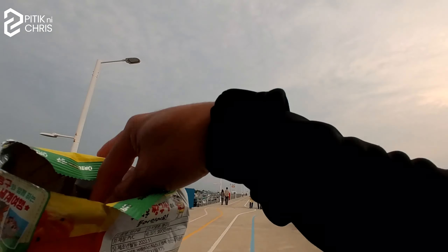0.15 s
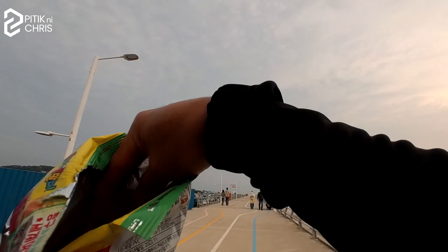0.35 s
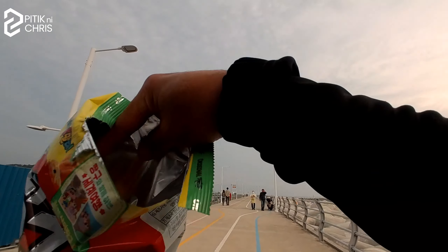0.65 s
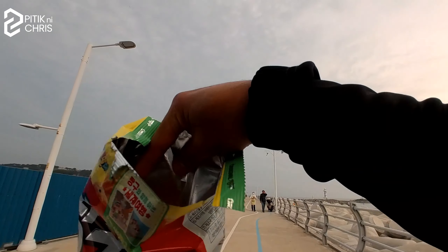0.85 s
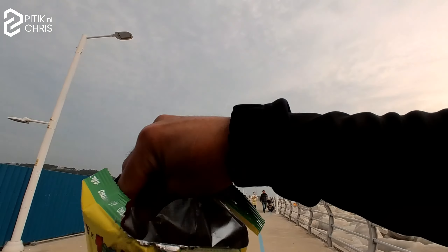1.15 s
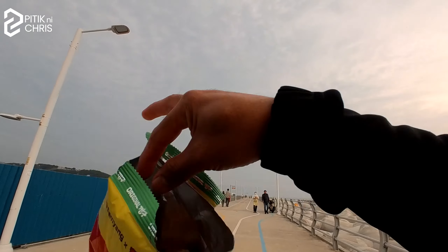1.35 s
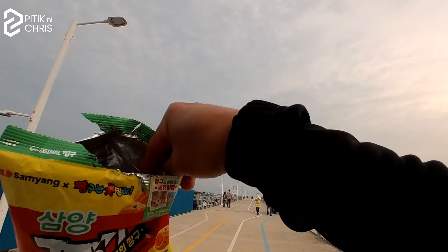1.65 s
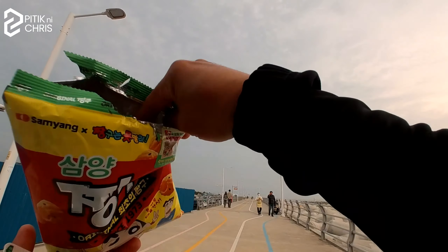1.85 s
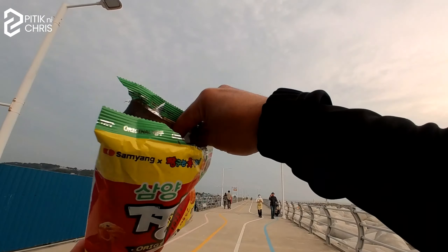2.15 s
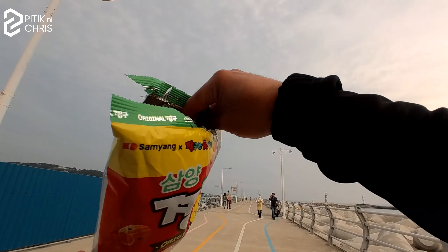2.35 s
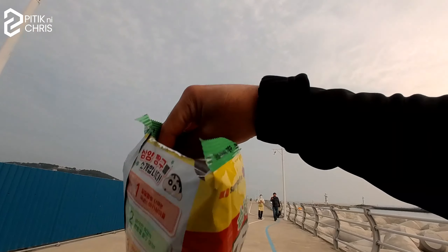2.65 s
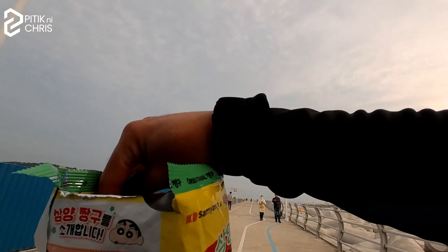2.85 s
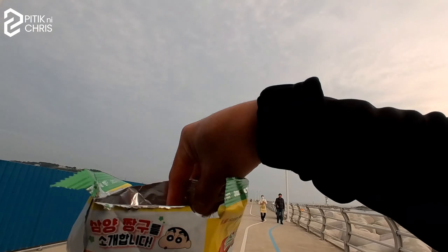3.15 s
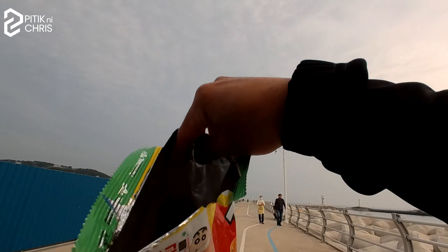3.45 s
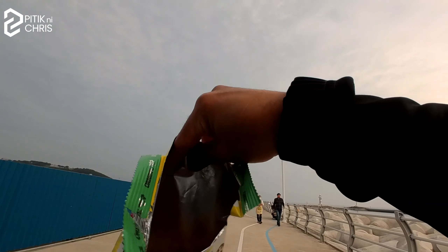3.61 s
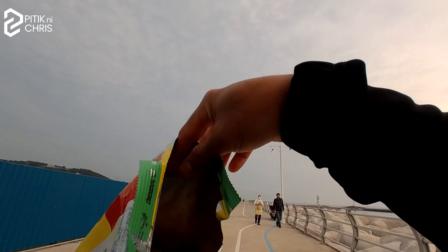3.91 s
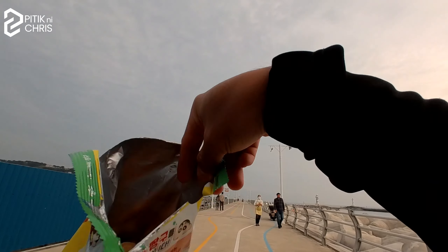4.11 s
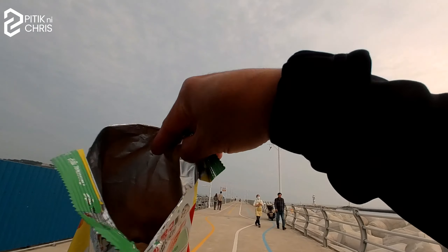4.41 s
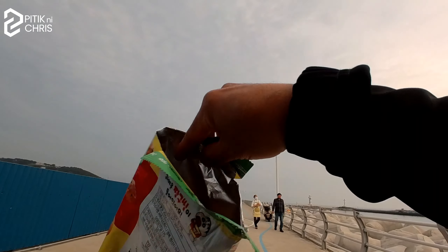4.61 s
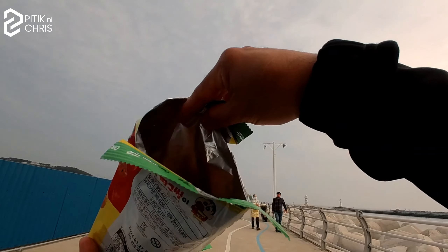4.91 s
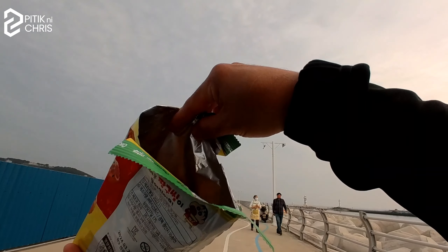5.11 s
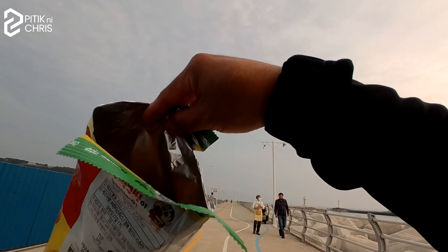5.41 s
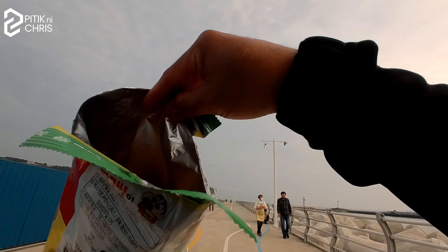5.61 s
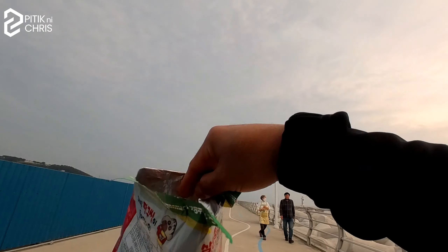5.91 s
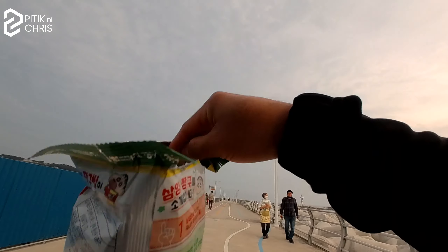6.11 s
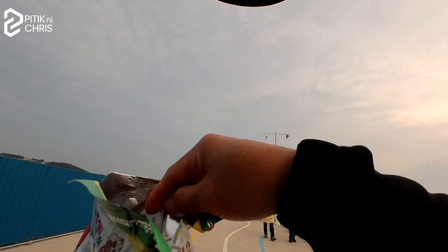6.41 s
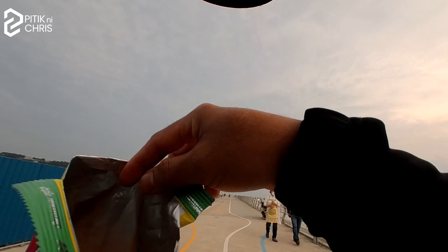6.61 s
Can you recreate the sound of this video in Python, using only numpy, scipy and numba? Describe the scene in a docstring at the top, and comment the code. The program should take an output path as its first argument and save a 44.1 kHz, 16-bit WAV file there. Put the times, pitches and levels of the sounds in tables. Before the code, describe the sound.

A hand rummages in a foil-lined snack bag close to the microphone, crackling and snapping over light wind buffeting and a faint distant rumble.

```python
"""Foil crackles and snaps close by: a hand rummages in a lined snack bag, outdoors on a wide path.
A small camera with two microphone ports sits just behind the bag. Creases in the film let go, each a
brief ring of scattered pitches; fingers hiss along the wall and twice a fingertip drags the film.
Breeze buffets the ports in shaped noise, low bumps ring briefly, and a rumble with a hum lies far off.
The recorder rounds off the loudest peaks and cuts the top."""
import sys
import numpy as np
from scipy import signal
from scipy.fft import rfft, irfft
from scipy.io import wavfile
from scipy.ndimage import uniform_filter1d
from numba import njit

SR = 44100
rng = np.random.default_rng(int(sys.argv[2]) if len(sys.argv) > 2 else 0)


def to_wav(s):
    """Save 16-bit WAV."""
    ch = np.atleast_2d(s).T  # columns
    pcm = np.round(np.clip(ch, -1, 1) * 32767)  # PCM
    wavfile.write(sys.argv[1], SR, pcm.astype(np.int16))


N = 298380  # samples
OPPOSITE = np.array([[1], [-1]])  # signs of the side signal at the left and right port


def undb(db):
    """Amplitude ratio of a level in dB."""
    return 10 ** (np.asarray(db) / 20)


def along(hz, table, axis=1):
    """Read a column of a table on a log-frequency axis."""
    rows = np.array(table, float)
    return np.interp(np.log(np.maximum(hz, 1)), np.log(rows[:, 0]), rows[:, axis])


def curve(table, s):
    """The columns of a time table at the moments s."""
    rows = np.array(table, float)
    return [np.interp(s, rows[:, 0], column) for column in rows[:, 1:].T]


def colour(x, table, axis=1):
    """Causal minimum-phase filter whose gain follows the table, made by folding the cepstrum."""
    gain = undb(along(np.fft.rfftfreq(2048, 1 / SR), table, axis=axis))
    cepstrum = irfft(np.log(gain))
    cepstrum[1:1024] *= 2
    cepstrum[1025:] = 0
    impulse = irfft(np.exp(rfft(cepstrum)))
    return signal.fftconvolve(x, impulse)[:N]


def walk(rate):
    """Random levels held 1 / rate s and slewed twice; spread near 1."""
    hold = int(SR / rate)
    steps = np.repeat(rng.standard_normal(N)[:N // hold + 1], hold)
    return 1.3 * uniform_filter1d(uniform_filter1d(steps, hold), hold)[:N]


def noise_pair(table, alike):
    """Coloured noise of rms 1 at two ports that share part of it."""
    mid, side = (colour(rng.standard_normal(N), table) for _ in range(2))
    alike = np.clip(alike, 0, 1)
    pair = np.sqrt(1 + alike) * mid + np.sqrt(1 - alike) * side * OPPOSITE
    return pair / pair.std()


def swell(s, peak_s, db, rise_s, hold_s, fall_s):
    """Power of a gesture that climbs to its peak, holds and dies away, 20 dB in each given time."""
    before = (peak_s - s) / rise_s
    after = (s - peak_s - hold_s) / fall_s
    return undb(2 * (db - 20 * np.maximum(np.maximum(before, after), 0)))


# The far rumble behind the path. Each row: frequency in Hz, relative density in dB per Hz.
RUMBLE = [(30, 2.5), (75, 4.5), (150, -4), (400, -11), (1200, -21), (2500, -34), (6000, -71), (12000, -85)]
RUMBLE_DB, RUMBLE_ALIKE = -35.5, .88  # mean level in dB; how alike the two ports are, 0 to 1
HUM_HZ, HUM_WIDTH_HZ, HUM_DB = 76, 9.2, -38.5


def distance():
    """Far rumble as slowly drifting noise, with one low hum: a narrow band of noise, so it wavers."""
    b, a = signal.iirpeak(HUM_HZ, HUM_HZ / HUM_WIDTH_HZ, SR)
    hum = signal.lfilter(b, a, rng.standard_normal(N))
    rumble = undb(RUMBLE_DB + walk(1.42)) * noise_pair(RUMBLE, RUMBLE_ALIKE)
    return rumble + undb(HUM_DB) * hum / hum.std()


# Breeze at the microphone ports. Each row: time in seconds, relative level in dB.
BREEZE = [(0, -33), (.6, -26), (1.3, -29), (2.1, -29), (2.6, -38), (3.3, -35), (4.2, -32), (4.6, -45),
          (5.4, -35), (6, -33), (6.3, -33), (6.77, -32)]
# Puffs standing out of it. Each row: peak in seconds, relative level in dB,
# time in seconds to rise and again to fall by 20 dB.
PUFFS = [(.002, -10, .025), (.165, -23, .12), (.34, -21, .05), (.55, -22, .15), (1.0, -23, .08),
         (1.37, -23, .1), (1.49, -23, .15), (1.785, -20, .06), (2.13, -20.5, .07), (2.22, -26, .08),
         (3.0, -26, .06), (3.09, -25, .05), (3.37, -22, .12), (3.88, -31, .3), (4.47, -28, .06),
         (4.78, -30, .08), (4.96, -25, .05), (5.14, -27, .08), (6.07, -27, .1), (6.22, -27, .07),
         (6.44, -23, .12), (6.56, -25, .07)]
# Spectrum of the buffeting. Each row: frequency in Hz, relative density in dB per Hz.
GUST = [(20, -5.5), (45, -1.5), (75, 3), (120, 2), (200, -10), (350, -17.5), (700, -59)]
# The part of it not common to both ports. Each row: frequency in Hz, share in dB.
APART = [(30, -2.5), (170, -3), (260, -13), (1000, -13)]


def breeze():
    """Buffeting is low noise that differs in part between the ports; strong gusts reach higher."""
    s = np.arange(N) / SR
    steady = undb(2 * curve(BREEZE, s)[0])
    puffs = sum(swell(s, peak_s, db, span_s, 0., span_s) for peak_s, db, span_s in PUFFS)
    db = 10 * np.log10(steady + puffs) + 2.5 * walk(27)
    mid, side = (colour(rng.standard_normal(N), GUST) for _ in range(2))
    buffet = (mid + colour(side, APART) * OPPOSITE) / mid.std()
    # the higher flapping grows faster than the gust, up to a limit
    flap = noise_pair([(90, -30), (160, -3), (240, 0), (400, -20), (800, -45)], .85)
    flap_db = np.minimum(db + 0.32 * (db + 11.5) - 11.5, -22)
    return undb(db - 1.5) * buffet + undb(flap_db) * flap


@njit
def ring(start, pole, rise, left, right, life, n):
    """Sum of dying sines that build up over a cycle, each with its own size and phase at either port."""
    out = np.zeros((2, n))
    for k in range(len(start)):
        z, lack = 1 + 0j, 1.
        for i in range(start[k], min(start[k] + life[k], n)):
            out[0, i] += (1 - lack) * (z * left[k]).imag
            out[1, i] += (1 - lack) * (z * right[k]).imag
            z *= pole[k]
            lack *= rise[k]
    return out


# How the two microphone ports disagree in phase.
# Each row: frequency in Hz, mean lag of the left port in radians, scatter of that lag in radians.
LAG = [(200, 0, .15), (800, .2, .22), (1500, .3, .5), (2000, .7, .6), (2600, 2.6, .8), (3500, 2.2, 1.3),
       (8000, 2.3, 1.5), (14000, 3, 1.7)]


def film(s, hz, size, t60):
    """Dying rings, falling 60 dB in t60 s; in the treble the paths to the ports fall out of step."""
    s, hz, size, t60 = (v.ravel() for v in np.broadcast_arrays(s, hz, size, t60))
    lag = along(hz, LAG) + along(hz, LAG, axis=2) * rng.standard_normal(len(s))
    pole = np.exp(2j * np.pi * hz / SR - np.log(1000) / (t60 * SR))
    rise = np.exp(-2.5 * hz / SR)
    start = np.clip(s * SR, 0, N - 1).astype(np.int64)
    life = (t60 * SR).astype(np.int64)
    left, right = size * np.exp(-.5j * lag), size * np.exp(.5j * lag)
    return ring(start, pole, rise, left, right, life, N)


# Low bumps, likely the camera being jogged. Each row: start in seconds, pitch in Hz, relative level in dB.
BUMPS = [(.0105, 210, 2), (.141, 110, 0), (.1655, 140, -3), (.188, 95, -4), (3.087, 170, -4),
         (3.362, 60, -1.5)]
BUMP_CYCLES = 5  # cycles to fall by 60 dB


def bumps():
    """Each bump is a low ring that dies in a few cycles."""
    s, hz, db = np.transpose(BUMPS)
    return film(s, hz, undb(db), BUMP_CYCLES / hz)


# Pushes of the hand in the bag, just in front of the microphones. Each row: peak in seconds,
# relative crackle level in dB, seconds to rise 20 dB, seconds held, seconds to fall 20 dB,
# brightness in dB at the peak, sheen of the top octave in dB at the peak.
PUSHES = [(.03, -40, .2, .18, .2, -5, 2), (.3, -28, .1, .04, .1, 4, 6), (.38, -22, .1, .03, .15, -3, 3),
          (.5, -16.5, .35, 0, .3, -2, 3), (.65, -15, .15, 0, .04, -2, -1),
          (.75, -27.5, .25, .18, .08, -2, -10), (.99, -27, .12, 0, .12, -3, -18),
          (1.24, -21.5, .2, 0, .25, -4, -7), (1.29, -24.5, .1, .09, .09, 5, -9),
          (1.45, -30, .15, 0, .06, 3, -4), (1.55, -29, .05, .04, .1, -5, -16),
          (1.63, -28, .15, .01, .05, -1, -3), (1.74, -20, .09, 0, .1, 2, 2),
          (1.77, -14, .08, 0, .045, 0, -2), (1.82, -33, .05, .05, .1, -5, -8),
          (1.91, -26.5, .08, .04, .15, 0, -3), (2.06, -21.5, .05, 0, .08, -2, -2),
          (2.12, -19, .17, .01, .15, 0, 1), (2.21, -27, .2, .03, .1, -2, 0),
          (2.28, -25.5, .08, 0, .3, 1, -3), (2.52, -32, .25, .09, .1, 0, 2),
          (2.78, -40, .04, .06, .1, 10, -7), (2.88, -25, .06, 0, .4, 1, 0), (2.96, -25, .1, 0, .15, -3, 0),
          (3.05, -27, .15, .04, .05, -1, 2), (3.18, -31, .05, .05, .05, 3, 1),
          (3.28, -21, .08, .13, .04, 1, 0), (3.49, -27, .15, .03, .09, 1, -7),
          (3.69, -17.5, .1, .03, .07, 5, -9), (3.91, -25, .15, .02, .3, 1, -9),
          (4.17, -23.5, .1, .06, .4, 1, -3), (4.44, -23, .08, 0, .1, 2, 2),
          (4.48, -15.5, .1, 0, .055, -2, -1), (4.54, -34, .05, .03, .2, 1, -4),
          (4.76, -23.5, .16, 0, .22, 0, -1), (4.9, -20, .12, .02, .2, 3, 1), (5.05, -37, .1, .03, .1, 6, 2),
          (5.19, -26, .025, 0, .02, -6, 0), (5.24, -36, .07, 0, .35, -2, -7),
          (5.37, -25, .025, .165, .08, 3, -2), (5.6, -36, .1, .05, .1, 0, -3),
          (5.78, -30, .05, 0, .1, 2, 0), (6.01, -19, .22, .01, .17, 3, -1),
          (6.24, -25.5, .2, 0, .12, -1, -2), (6.36, -19, .25, .02, .16, 1, 1),
          (6.55, -41, .1, .02, .1, -2, -3), (6.7, -41, .05, .1, .1, -1, -8)]
REST_DB, REST_BRIGHT_DB, REST_SHEEN_DB = -50, -3, -6  # between pushes
DULL_PER_DB, MATT_PER_DB = .3, .3  # dB of brightness and of sheen lost per dB below the peak of a push


def hand(s):
    """Crackle level, brightness, sheen: pushes add up, the loudest sets the colour, flanks are duller."""
    grid = np.arange(0, N / SR + .01, .002)
    rows = np.array(PUSHES)
    rest = undb(2 * REST_DB) + 0 * grid
    power = np.array([swell(grid, *row[:5]) for row in rows] + [rest])
    total = power.sum(axis=0)
    db = 10 * np.log10(total)
    # averages weighted by the power of each push
    traits = np.vstack([rows[:, [1, 5, 6]], [REST_DB, REST_BRIGHT_DB, REST_SHEEN_DB]])
    peak_db, bright_db, sheen_db = traits.T @ power / total
    bright_db = bright_db + DULL_PER_DB * (db - peak_db)
    sheen_db = sheen_db + MATT_PER_DB * (db - peak_db)
    return [np.interp(s, grid, v) for v in (db, bright_db, sheen_db)]


def sheen(s):
    """Top octave against the rest of the treble, as the bag turns."""
    return hand(s)[2]


def scuff():
    """Fingers and crumbs sliding on the wall: a fluttering hiss that thins out when the hand rests."""
    db, bright_db, sheen_db = hand(np.arange(N) / SR)
    dull = noise_pair([(150, 0), (2200, 0), (3600, -30)], .94)
    keen = noise_pair([(1800, -40), (2800, 0), (7000, 0), (9000, -30)], 0)
    fine = noise_pair([(6000, -40), (8000, 0), (16000, 0)], 0)
    busy_db = 0.1 * (db + 11)
    flutter = undb(3.2 * walk(90) + 2.56 * walk(300))
    treble = flutter * undb(bright_db) * (undb(-4) * keen + undb(sheen_db + 2.5) * fine)
    return undb(db + busy_db + 2.57 * walk(60)) * (undb(-2) * dull + treble)


# A fingertip dragged over taut film inside the bag: one long stroke, then one quick slip.
# Each row of a stroke: time in seconds, whistle in Hz, relative level in dB.
LONG_STROKE, QUICK_SLIP = [
    [(2.765, 2960, -55), (2.79, 2930, -29), (2.82, 2960, -30), (2.85, 2930, -34), (2.92, 2600, -28),
     (2.95, 2450, -60)],
    [(3.179, 3280, -13), (3.1845, 2390, -11), (3.192, 1500, -17)],
]


def drag(stroke, ring_s):
    """Stick and slip: quick irregular tugs ring the stretched film and the slack wall beside it."""
    s = np.arange(stroke[0][0], stroke[0][0] + .2, .0005)
    s = s + .0005 * rng.random(len(s))
    hz, db = curve(stroke, s)
    size = undb(db) * (s < stroke[-1][0])
    wobble = 1 + .035 * rng.standard_normal((2, len(s)))
    taut = film(s, hz * wobble[0], size, ring_s)
    slack = film(s, 0.357 * hz * wobble[1], undb(-16) * size, 0.028)
    return taut + slack


def crease(s, body_db, treble_db, sheen_db, t60, ragged_s, scatter_db, count):
    """A crease lets go with one inward jerk; small facets follow raggedly, ring high and die soon."""
    place, when, strength = rng.random((len(s), count, 3)).transpose(2, 0, 1)
    # one pitch in each of count equal log-frequency bands
    hz = 170 * (16000 / 170) ** ((np.arange(count) + place) / count)
    treble, top = 1 / (1 + (2600 / hz) ** 6), 1 / (1 + (7700 / hz) ** 6)
    db = (1 - treble) * body_db[:, None] + treble * treble_db[:, None] + top * sheen_db[:, None]
    db = db + scatter_db * np.log(strength + 0.0085)
    # sizes rise with pitch so that the sum is flat per Hz
    size = -undb(db) * (hz / 1400) ** 0.93
    late_s = ragged_s * when ** 2 * (.3 + 0.58 * treble)
    return film(s[:, None] + late_s, hz, size, t60 * (hz / 1400) ** -.4)


def crackle(count=4000):
    """Many small creases, bunched; the harder the hand works the more of them go."""
    slot, keep, luck, tint = rng.random((count, 4)).T
    s = (np.arange(count) + slot) / count * N / SR
    db, bright_db, _ = hand(s)
    share = np.clip(undb(.6 * (db + 20)), .05, 1)
    bunch_db = 3.5 * walk(35)[(s * SR).astype(int)]
    luck_db = -2.9 * np.log(luck + 0.013)
    # the fewer that go, the larger each is
    size_db = db - 9 + bunch_db + luck_db - 10 * np.log10(share)
    size_db += np.where(keep < share, 0, -120)  # silence the rest
    treble_db = size_db + bright_db + 4.2 * (tint - .5)
    return crease(s, size_db, treble_db, sheen(s), 0.013, ragged_s=.0015, scatter_db=2, count=12)


# Big creases that snap out of the crackle, close to the microphones.
# Each row: start in seconds, relative ring level in dB, main ring in Hz, relative treble level in dB.
SNAPS = [(.0131, -20, 816, -33), (.1038, -26, 1220, -42), (.1228, -24, 1900, -50), (.1716, -23, 1070, -37),
         (.2341, -22.5, 1270, -36), (.3105, -16, 800, -20), (.3355, -17, 1080, -22), (.3525, -30, 980, -23),
         (.3815, -29, 1360, -15), (.3934, -25, 1610, -14), (.4044, -28, 1500, -19), (.4322, -11, 920, -20),
         (.442, -11, 1310, -11), (.458, -10, 1450, -18), (.472, -9, 1020, -18), (.494, -1.5, 1630, -14),
         (.4997, -8, 1210, -15), (.519, -11, 2040, -23), (.5264, -9, 1390, -15), (.5377, -4.5, 1670, -18),
         (.5519, -8, 1480, -17), (.5954, -9, 1360, -12), (.6374, -16, 1160, -12), (.6431, -1.5, 1870, -19),
         (.6506, -10, 1450, -12), (.6681, -15, 1400, -15), (.7434, -19, 1410, -17), (.7553, -11, 1540, -28),
         (.7604, -13, 1290, -15.5), (.7665, -12, 1340, -25), (.8202, -3, 1160, -17),
         (.8608, -12, 1060, -22), (.878, -15, 1050, -41), (.8941, -29, 990, -17), (.92, -3, 1980, -17.5),
         (.9757, -15, 1040, -43), (1.0178, -21, 1120, -42), (1.1068, -24, 1150, -40),
         (1.114, -28, 1260, -39), (1.1468, -14, 2020, -20), (1.191, -7, 1480, -21),
         (1.2037, -11, 1530, -30), (1.2243, -6.5, 1290, -19), (1.2345, -9, 1790, -28),
         (1.2456, -7, 1120, -28), (1.2515, -9, 1820, -19), (1.2678, -11, 1620, -18),
         (1.2999, -10, 1070, -31), (1.3064, -17, 1700, -13.5), (1.375, -7, 1230, -25),
         (1.3839, -16, 1070, -19), (1.4576, -20, 1510, -17.5), (1.5475, -16, 1130, -24),
         (1.59, -27, 1060, -23), (1.6417, -17, 804, -26), (1.6854, -27, 1000, -16.5),
         (1.7112, -13, 1160, -26), (1.7206, -18, 1140, -14), (1.7377, -10, 1110, -22),
         (1.7641, -5.5, 1370, -19), (1.7705, -10, 1490, -17), (1.81, -14.5, 1580, -28),
         (1.8321, -24, 1090, -17), (1.8657, -15, 980, -24), (1.8985, -10, 1220, -17.5),
         (1.9224, -19, 1500, -15), (2.002, -18, 1210, -42), (2.0406, -9, 1460, -17.5),
         (2.0492, -10.5, 1460, -31), (2.073, -23, 1210, -26), (2.2903, -10, 960, -24),
         (2.3511, -13, 1130, -24), (2.4196, -18, 1760, -26), (2.4486, -19, 1870, -21),
         (2.463, -14, 1520, -27), (2.477, -23, 1610, -20.5), (2.4919, -14.5, 1940, -31),
         (2.5115, -25, 1160, -18), (2.517, -17, 1430, -28), (2.5473, -17, 1420, -21),
         (2.5678, -15, 1230, -35), (2.5769, -17, 1750, -19.5), (2.5864, -40, 1110, -28),
         (2.5945, -34, 960, -29), (2.6171, -23, 880, -29), (2.661, -21, 935, -30), (2.686, -33, 806, -35),
         (2.7286, -27, 810, -35), (2.7603, -33, 920, -39), (2.8686, -15, 1190, -24),
         (2.8736, -16, 1220, -17.5), (2.9124, -16, 1020, -36), (2.9646, -7.5, 1430, -25),
         (3.045, -14, 970, -23), (3.135, -20, 1430, -26.5), (3.1803, -10, 2850, -22),
         (3.1836, -9, 2250, -24), (3.1937, -14, 1480, -20), (3.2118, -17, 1200, -20),
         (3.2248, -12.5, 1100, -21), (3.265, -16, 1390, -23), (3.276, -6.5, 1440, -15.5),
         (3.2923, -22, 1080, -17), (3.326, -10, 1390, -27), (3.337, -27, 1270, -13),
         (3.3754, -9.5, 1120, -31), (3.3849, -15, 1030, -17), (3.391, -9, 1320, -23),
         (3.4014, -5, 1090, -14), (3.428, -21, 1130, -24), (3.4874, -16, 1050, -27),
         (3.4983, -15, 1210, -31), (3.5257, -13.5, 1280, -24), (3.578, -19, 2010, -24),
         (3.6019, -21, 1560, -22), (3.628, -12, 1100, -29), (3.6532, -29, 1470, -22),
         (3.6898, -9, 1570, -18), (3.7062, -8.5, 1450, -26), (3.7273, -9.5, 1160, -23),
         (3.8368, -22, 1070, -17.5), (3.885, -14, 1610, -33), (3.8926, -25, 1870, -19.5),
         (3.9015, -14, 1530, -29), (4.0622, -35, 1400, -27), (4.071, -16, 1000, -43),
         (4.1566, -14, 1560, -22), (4.1736, -13, 1360, -41), (4.1851, -18, 1500, -17.5),
         (4.217, -14, 1370, -23), (4.2697, -17, 1240, -19), (4.3362, -16, 1390, -24),
         (4.36, -21, 1510, -23), (4.3944, -32, 1520, -26), (4.418, -13, 1150, -20),
         (4.4334, -14, 1500, -26), (4.4648, -7.5, 1170, -20), (4.4804, -9, 1220, -31),
         (4.5594, -20, 1440, -28), (4.5702, -18, 1550, -24), (4.616, -16, 1510, -36),
         (4.6726, -30, 1550, -33), (4.6912, -19, 1540, -24), (4.7063, -21, 1280, -25),
         (4.772, -13, 1180, -39), (4.8878, -4.5, 1290, -20), (4.899, -15, 1780, -15.5),
         (4.9067, -12, 1210, -28), (4.9904, -15, 1280, -30), (5.085, -22, 1530, -36),
         (5.1414, -22, 1180, -30), (5.186, -14, 1180, -23), (5.2262, -32, 1990, -31),
         (5.2808, -21, 1360, -29), (5.314, -22, 805, -33), (5.3665, -18, 1060, -27),
         (5.3939, -19, 1170, -26), (5.4321, -15, 1150, -37), (5.4746, -14, 810, -17.5),
         (5.6488, -29, 1400, -30), (5.763, -25, 1770, -22), (5.7725, -11, 2100, -28),
         (5.7954, -18, 1490, -31), (5.8288, -16, 1310, -22), (5.8466, -16, 840, -22),
         (5.8899, -13, 1470, -25), (5.9992, -7, 1630, -17), (6.0639, -12, 1120, -39),
         (6.1813, -28, 1040, -27), (6.216, -12.5, 990, -19), (6.2311, -10.5, 1160, -16.5),
         (6.2386, -11.5, 1330, -18), (6.2546, -28, 1210, -18), (6.3516, -9, 1530, -22),
         (6.3655, -11, 1080, -26), (6.3913, -7, 1630, -25), (6.435, -15, 1130, -31),
         (6.4614, -10, 1190, -20), (6.4938, -37, 1590, -18.5), (6.5512, -27, 1030, -29),
         (6.5582, -22, 1560, -30), (6.6319, -23, 1700, -26), (6.654, -20, 1000, -34),
         (6.7039, -25, 840, -18)]
# The quick slip ends in one long ring: start in seconds, pitch in Hz, relative level in dB,
# seconds to fall by 60 dB.
PING = (3.1938, 1470, -.5, .02)
SNAP_RING_S, SNAP_RING_SPREAD = .009, .1  # median seconds to fall by 60 dB; spread of its logarithm


def snaps():
    """Big creases: one dominant ring, the spray of facets and a fainter settling just after."""
    s, ring_db, hz, treble_db = np.transpose(SNAPS)
    t60 = SNAP_RING_S * np.exp(SNAP_RING_SPREAD * rng.standard_normal(len(s)))
    main = film(s, hz, -undb(ring_db + 3.0), np.clip(t60, .003, .06))
    spray = crease(s, ring_db - 4, treble_db + 3.5, 0.86 * sheen(s), 0.011,
                   ragged_s=.0012, scatter_db=2.5, count=24)
    settle = crease(s + 0.0029, ring_db - 16, treble_db - 6.5, 0.84 * sheen(s), 0.0085,
                    ragged_s=0.0055, scatter_db=0.5, count=16)
    ping_s, ping_hz, ping_db, ping_t60 = PING
    ping = film(ping_s, ping_hz, -undb(ping_db), ping_t60)
    return main + spray + settle + ping


# Colour of the bag as it reaches the camera. Each row: frequency in Hz, gain in dB.
BAG = [(150, -1.5), (500, 5), (830, -0.5), (1200, 3), (1600, 0.5), (2250, -3.5), (2600, -3), (3300, -8),
       (5000, -10), (7400, -16), (9500, -23.5), (13200, -22.5), (14500, -24), (15500, -54)]
# The left port is shaded from much of the treble. Each row: frequency in Hz, left minus right in dB.
SHADE = [(700, 0), (1200, -1), (1550, .4), (2250, 7), (2600, 0), (3300, -6.5), (5000, -11), (7400, -4),
         (8500, -2), (11500, -4.5), (15500, 0)]


def scene():
    """The bag, coloured for each port, over bumps, breeze and distance."""
    strokes = drag(LONG_STROKE, 0.022) + drag(QUICK_SLIP, 0.0084)
    bag = snaps() + crackle() + scuff() + strokes
    # each port takes half of the difference
    ports = [[(hz, side * db / 2) for hz, db in SHADE] for side in (1, -1)]
    bag = np.array([colour(colour(bag[k], BAG), ports[k]) for k in range(2)])
    return bag + bumps() + breeze() + distance()


TOP_HZ = 15700  # upper edge of the recorder's band


def record(dry):
    """The loudest peaks bend smoothly below full scale, then a steep low-pass cuts the top."""
    soft = dry / (1 + np.abs(dry) ** 6) ** (1 / 6)
    low_pass = signal.ellip(8, .2, 70, TOP_HZ, fs=SR, output="sos")
    return np.clip(signal.sosfilt(low_pass, soft), -1, 1)


dry = scene()
out = record(dry)
to_wav(out)
```